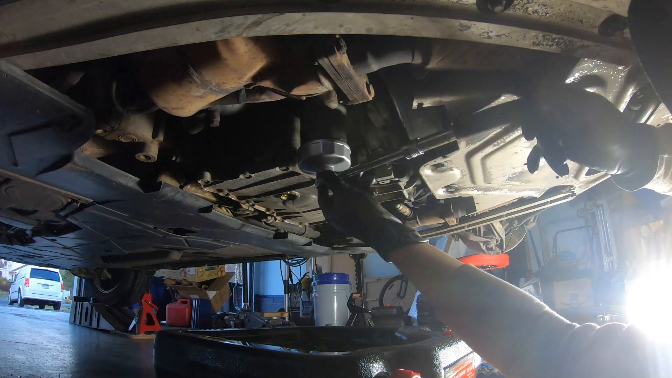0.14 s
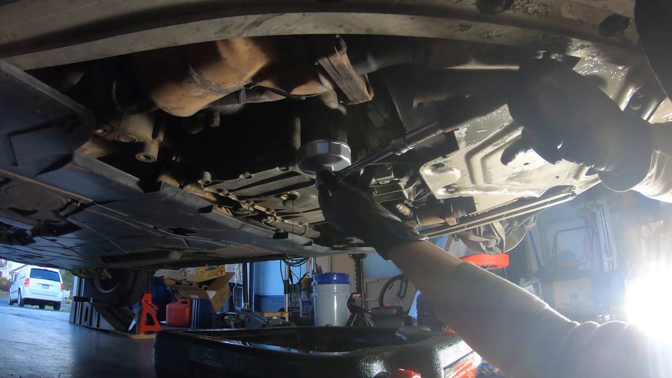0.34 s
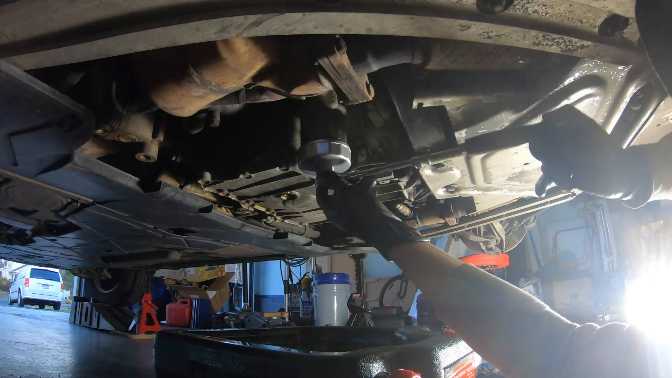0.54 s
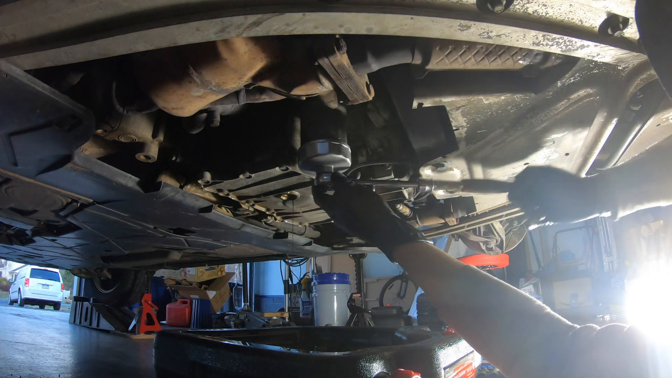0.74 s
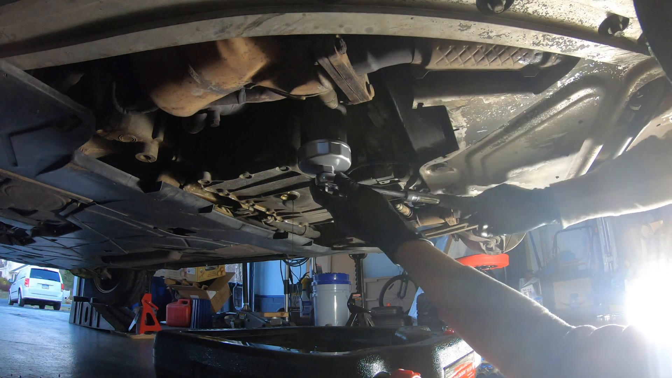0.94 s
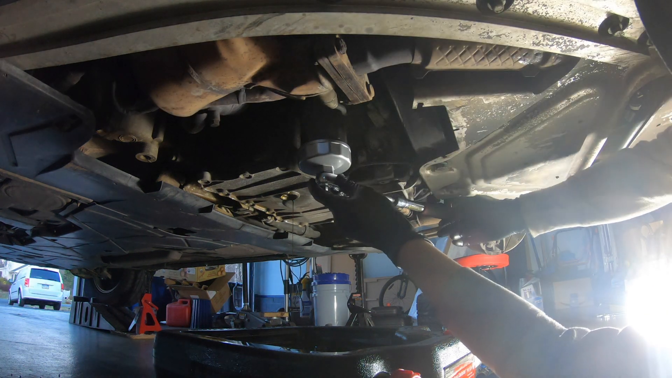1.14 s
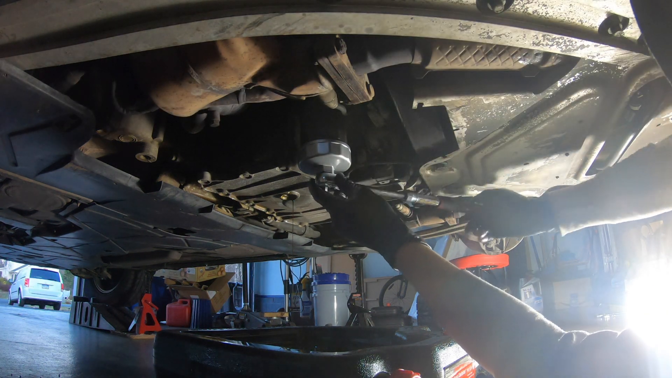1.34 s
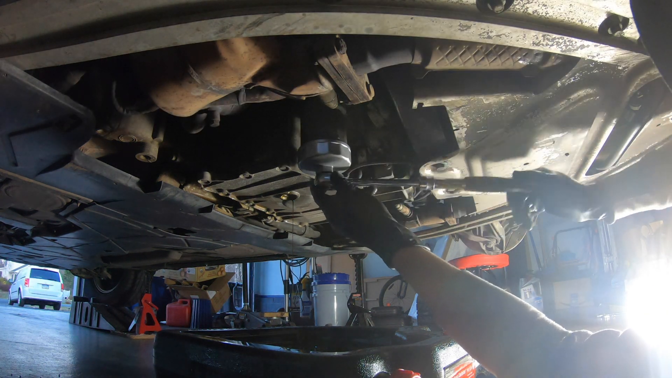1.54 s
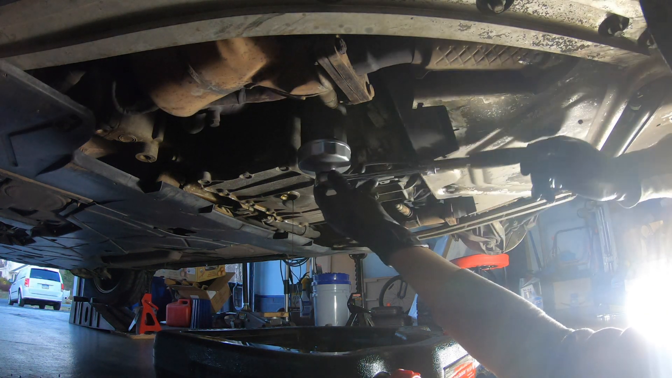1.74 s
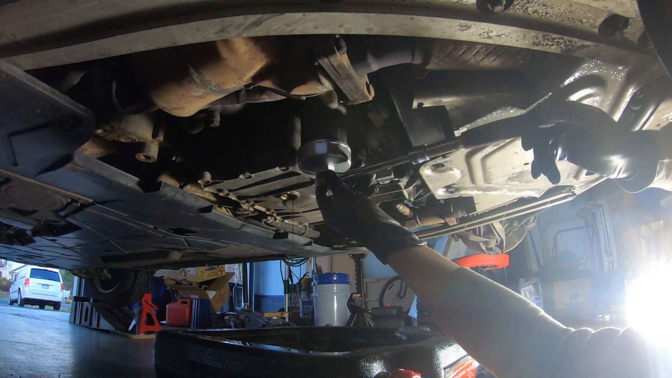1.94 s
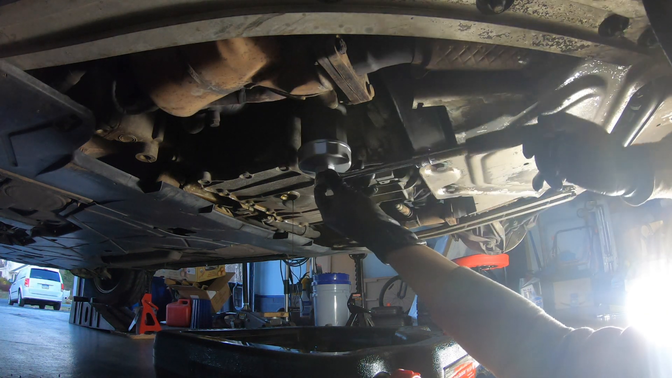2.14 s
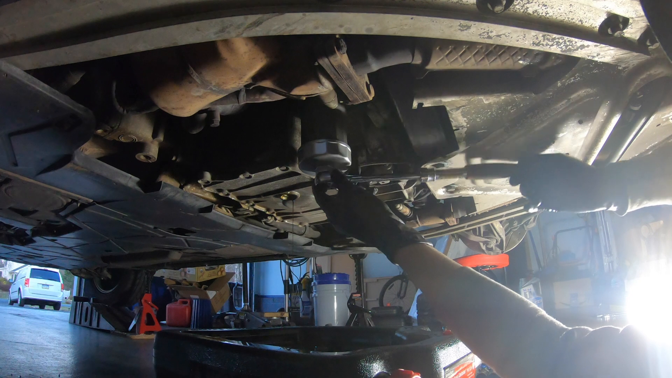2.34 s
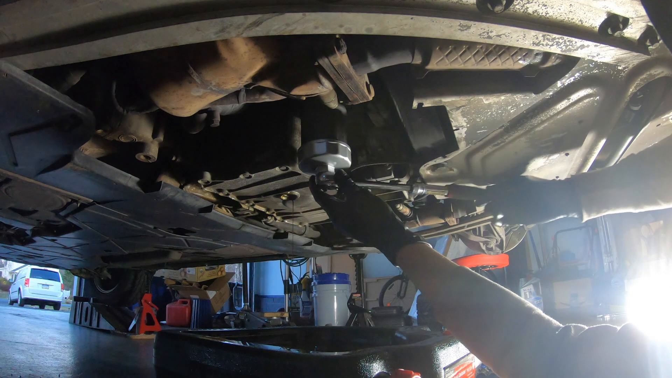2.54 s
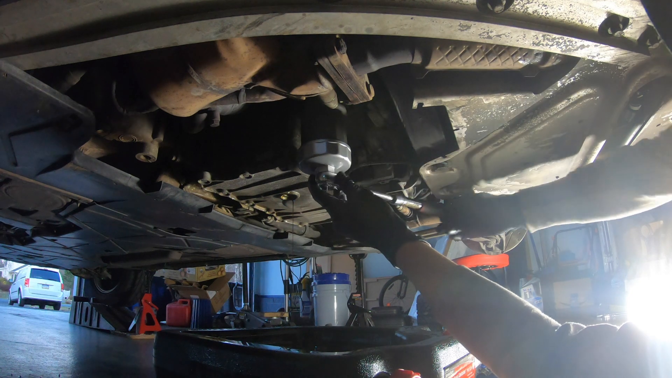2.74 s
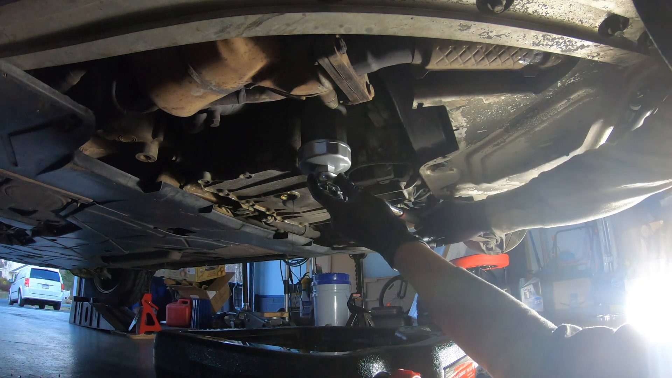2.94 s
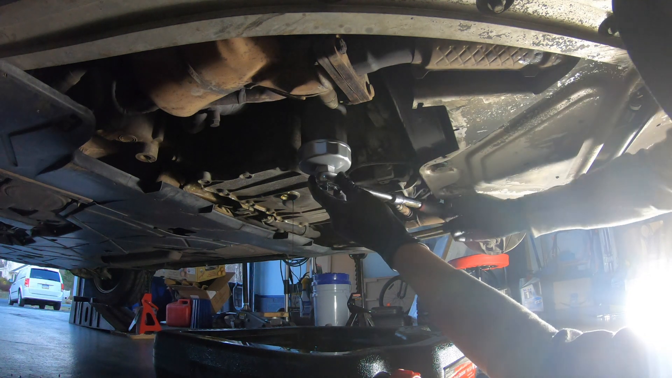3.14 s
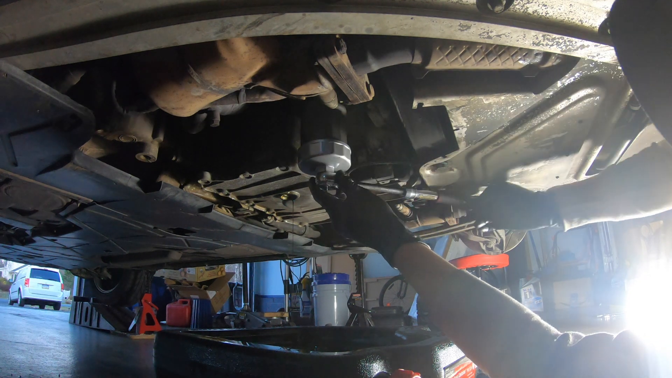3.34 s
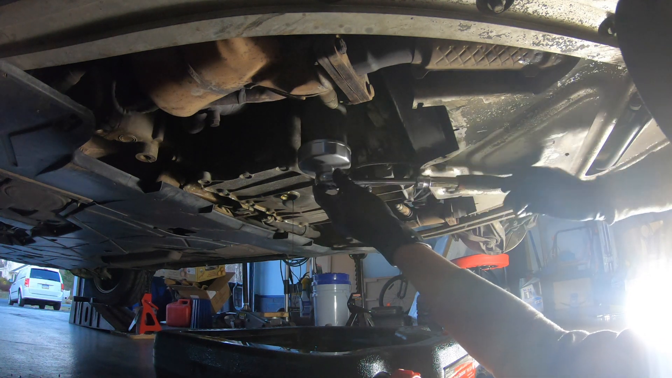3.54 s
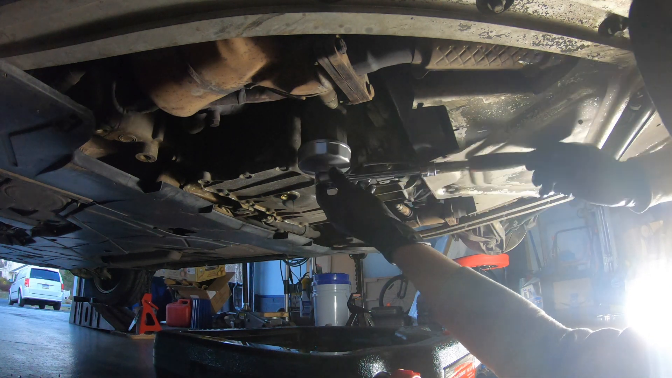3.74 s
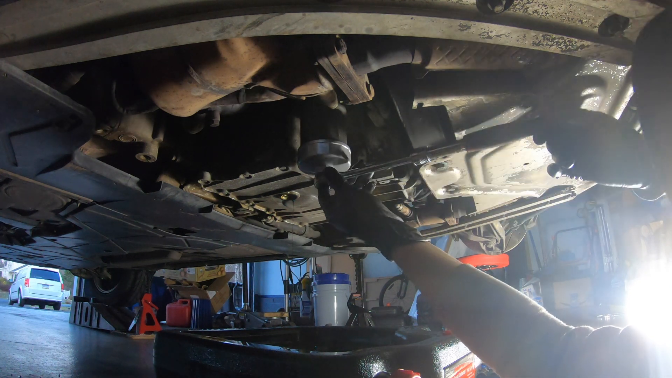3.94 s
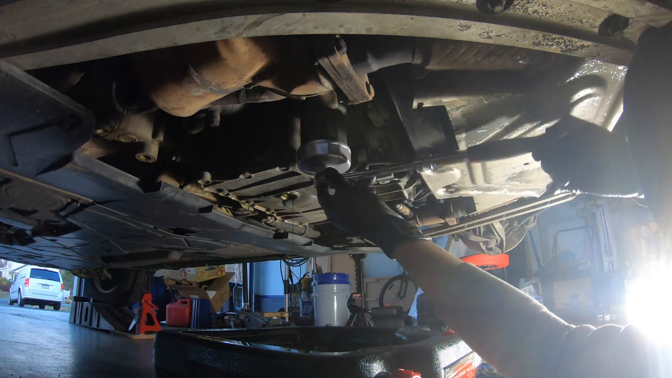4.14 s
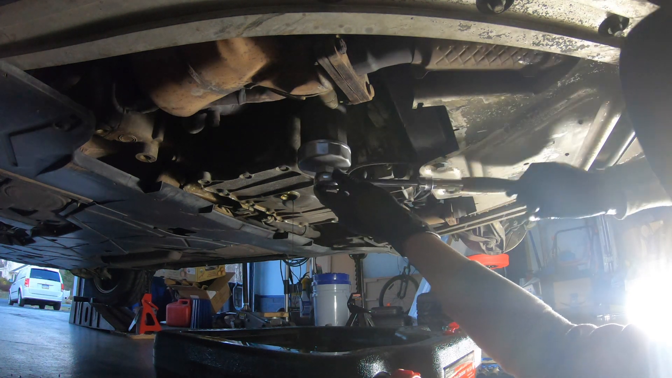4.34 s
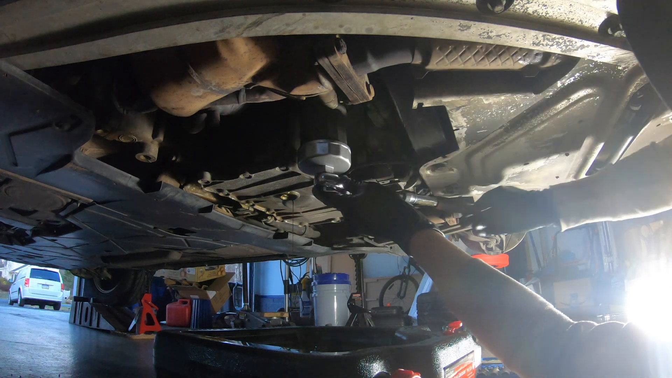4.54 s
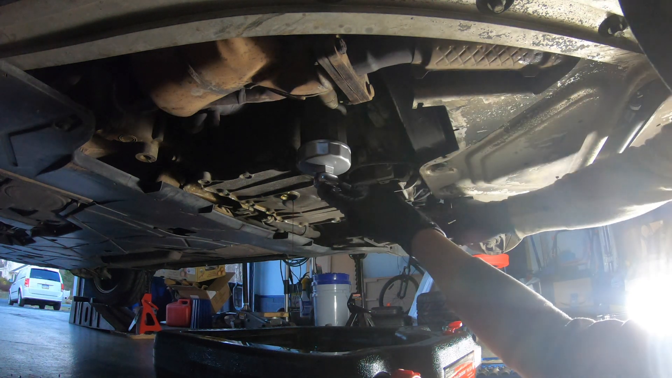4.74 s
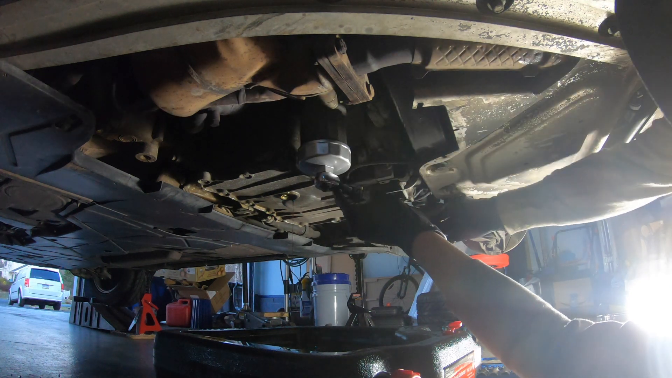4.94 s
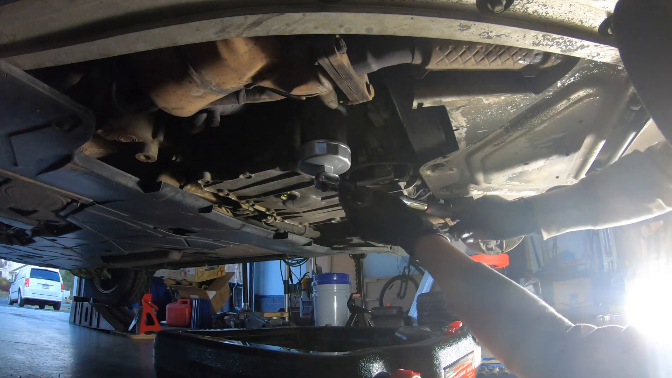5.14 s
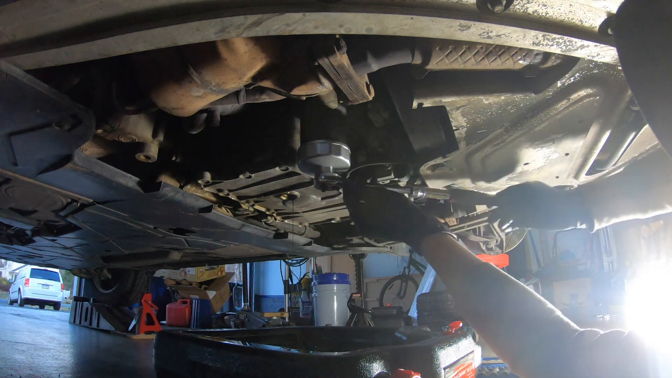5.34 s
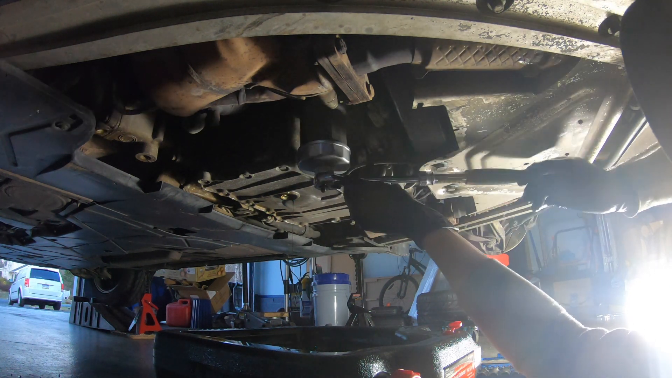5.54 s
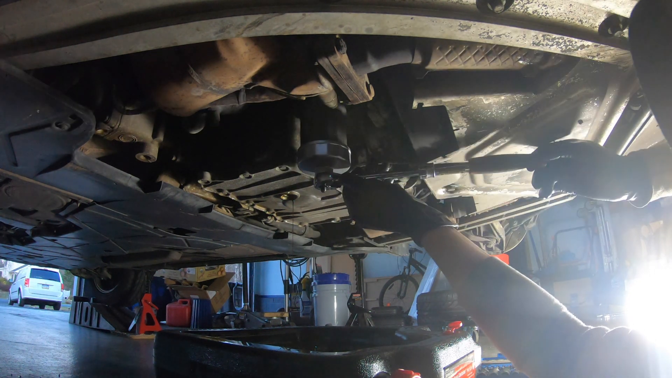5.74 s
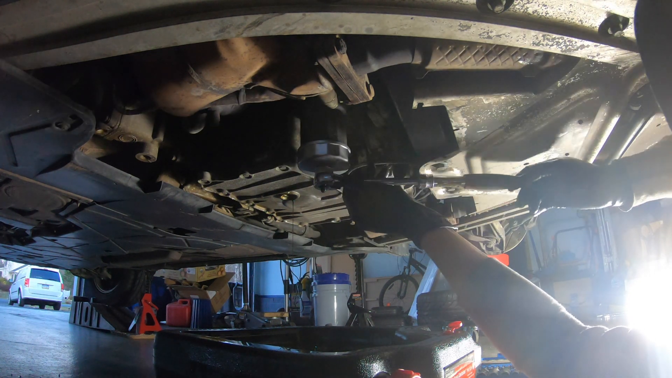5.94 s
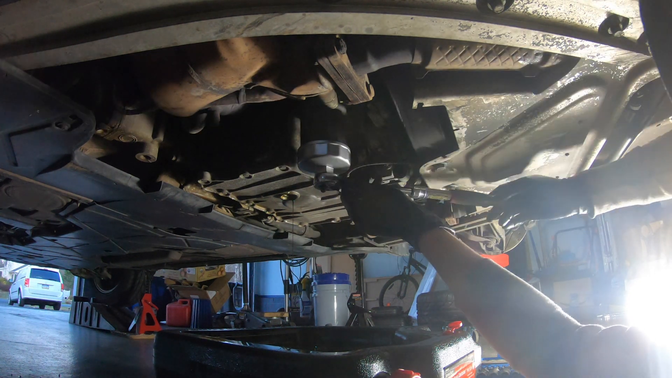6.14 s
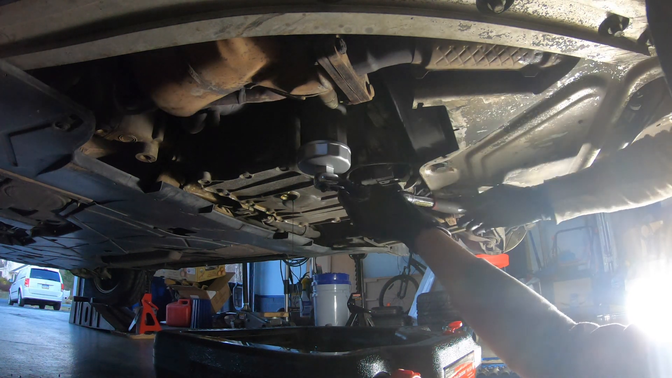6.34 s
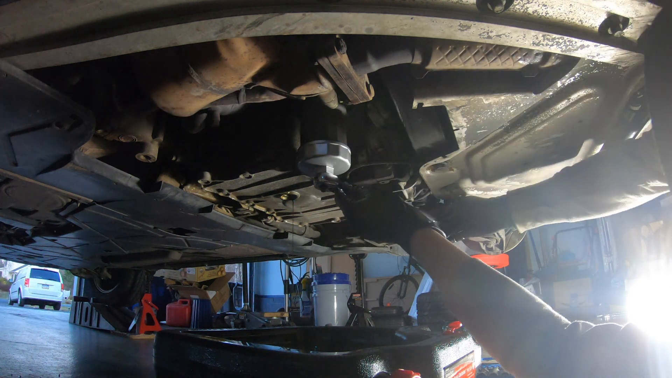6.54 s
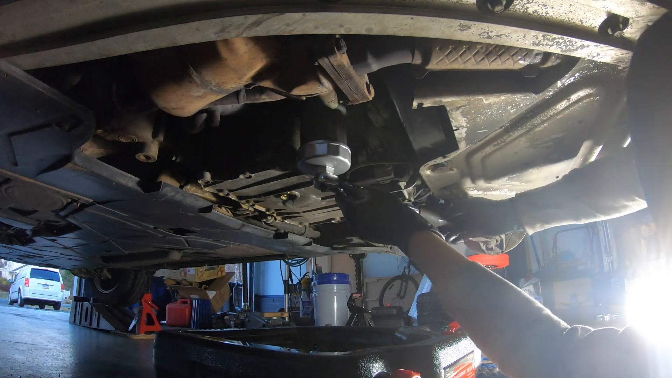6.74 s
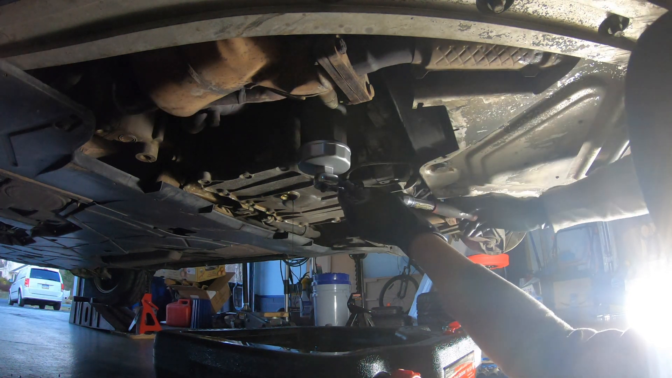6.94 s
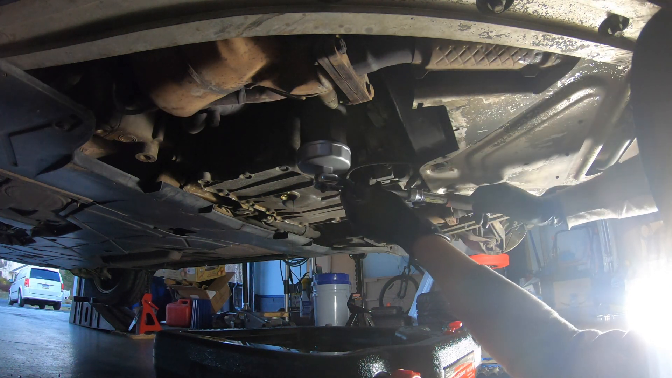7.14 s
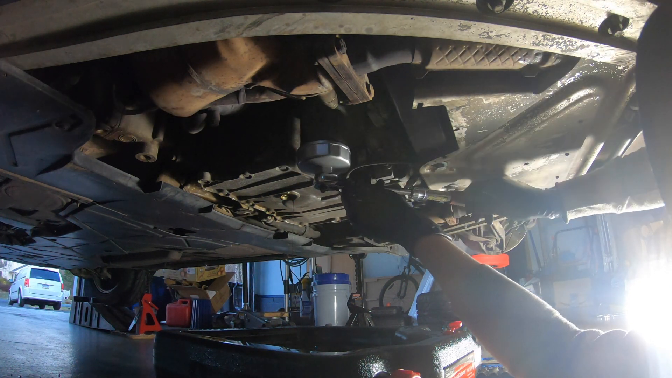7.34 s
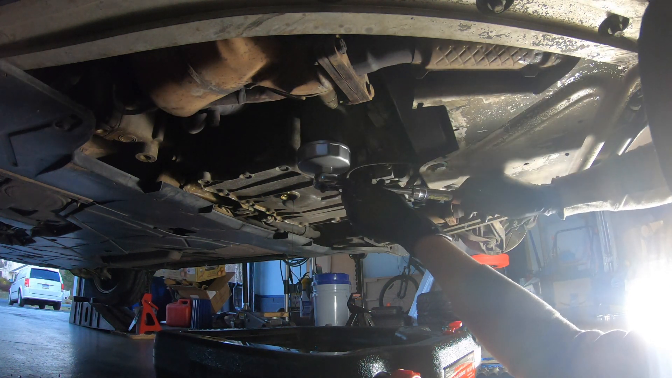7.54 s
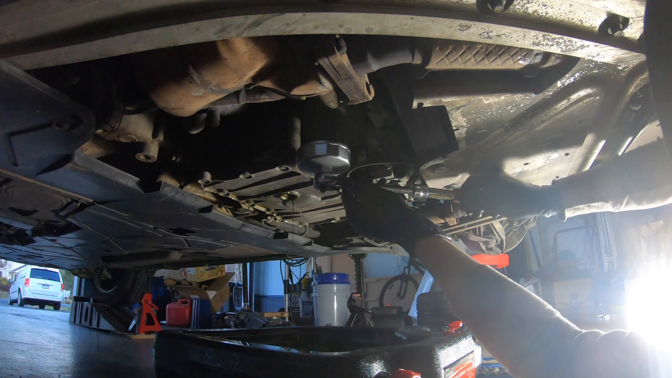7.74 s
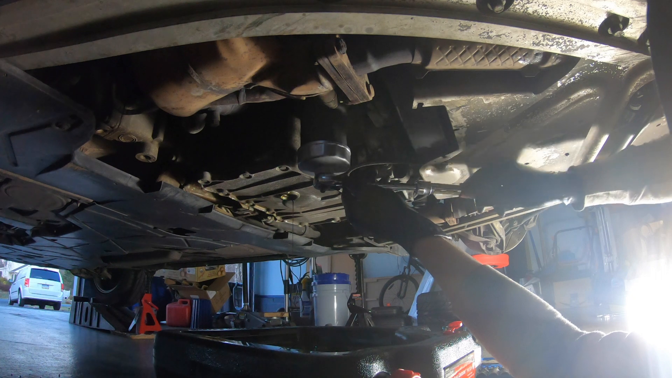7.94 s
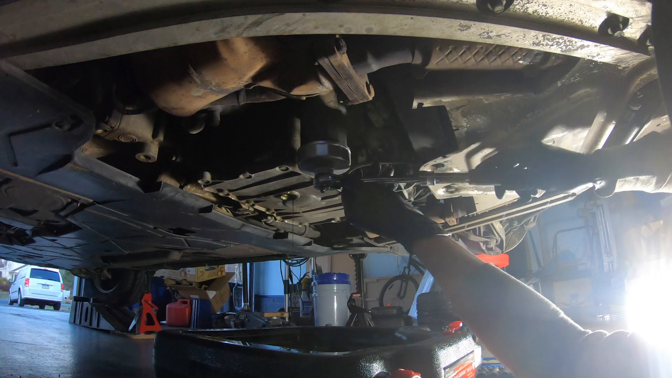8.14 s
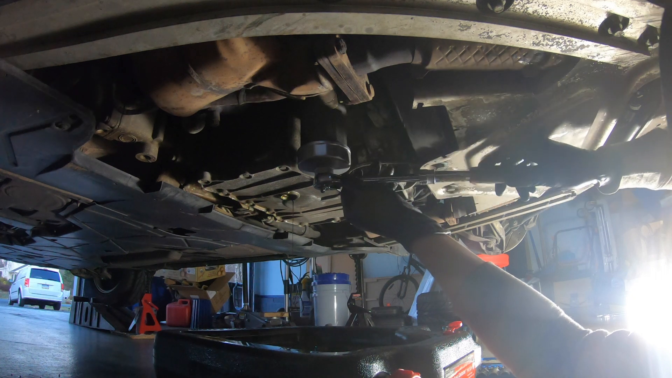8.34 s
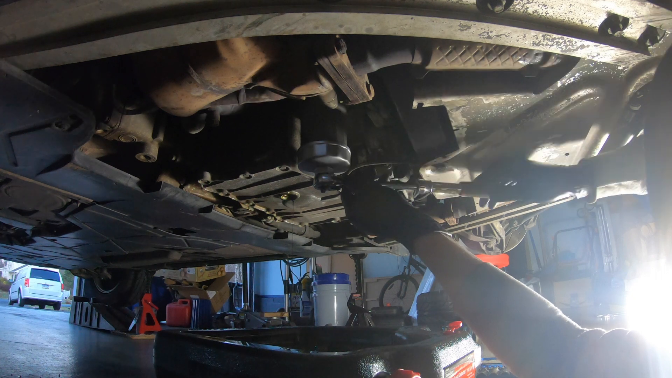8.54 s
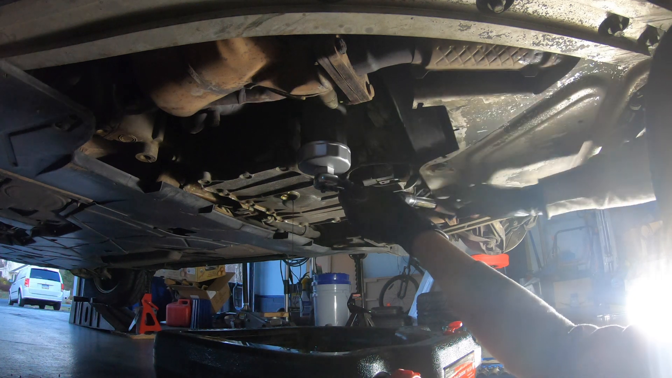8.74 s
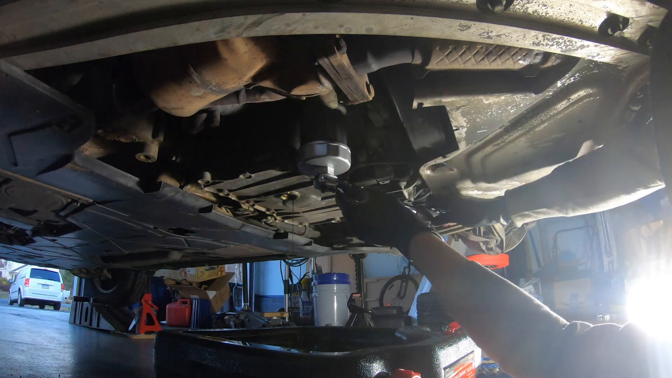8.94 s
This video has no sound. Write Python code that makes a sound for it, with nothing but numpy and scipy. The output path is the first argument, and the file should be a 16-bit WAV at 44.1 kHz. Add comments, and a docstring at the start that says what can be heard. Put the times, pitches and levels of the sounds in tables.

```python
"""A low, unevenly swelling drone and soft air in a garage, then a gloved hand skids with a squawk and a thud.
Under a car a ratchet works a filter housing: runs of pawl clicks, socket knocks, light finger ticks.
Blows are noise cracks, steel modes and underbody scatter; the glove is shaped noise, its skid a slowing
train of slips. Two close microphone ports hear it all, with a soft garage tail behind the near sounds."""
import sys
import numpy as np
from scipy import signal
from scipy.fft import rfft, irfft
from scipy.io import wavfile
from scipy.ndimage import uniform_filter1d

SR = 44100
rng = np.random.default_rng(int(sys.argv[2]) if len(sys.argv) > 2 else 0)


def output_pcm(signal):
    """Save a mono or channel-first signal as 16-bit PCM at the path in sys.argv[1].

    Samples are clipped to [-1, 1] before scaling.
    """
    pcm = np.clip(np.atleast_2d(signal).T, -1, 1) * 32767
    wavfile.write(sys.argv[1], SR, np.round(pcm).astype(np.int16))


N = 397341  # length in samples, about 9 s

# colour of sound scattered by the underbody: hz, level_db (per Hz)
SCATTER_COLOUR = [(1200, 8.5), (3000, -2.5), (7000, -4.5)]
# colour of a soft, low thud: hz, level_db (per Hz)
THUD_COLOUR = [(60, -29), (220, -7.5), (325, 5), (470, -14.5), (950, -3.5), (1500, -19), (2700, -16),
               (7000, -55)]
SOCKET_HZ = 3260  # strongest resonance of the socket


def amp(db):
    """Decibels to gain."""
    return 10 ** (np.asarray(db) / 20)


def evened(x):
    """Scales to rms 1."""
    return x / np.sqrt(np.mean(x ** 2) + 1e-20)


def read(points, hz):
    """Reads a table on a log-frequency axis."""
    f, value = np.transpose(points)
    return np.interp(np.log(hz + 1), np.log(f + 1), value)


def add(mix, s, sound):
    """Mixes a stereo sound in at time s."""
    part = mix[:, max(round(s * SR), 0):][:, :sound.shape[1]]
    part += sound[:, :part.shape[1]]


def noise(size, colour=None):
    """Stereo noise as two close microphone ports hear a diffuse field, flat or coloured, rms 1."""
    # left-right likeness of scattered sound: hz, correlation
    likeness = [(150, 0.9), (550, 0.35), (1100, 0.059), (2200, 0.43), (4000, 0.57), (10000, 0.057)]
    hz = np.fft.rfftfreq(size, 1 / SR)
    mid, side = rfft(rng.standard_normal((2, size)))
    same = np.clip(read(likeness, hz), -1, 1)
    mid, side = mid * np.sqrt(1 + same), side * np.sqrt(1 - same)
    gain = 1 if colour is None else amp(read(colour, hz))
    return evened(irfft(np.array([mid + side, mid - side]) * gain, size))


def causal(db):
    """Minimum-phase response for a gain curve, so that attacks stay sharp."""
    log_gain = np.log(amp(np.r_[db, db[-2:0:-1]]))
    return np.exp(np.conj(signal.hilbert(log_gain)))[:len(db)]


def grain(depth_db, size=90):
    """An uneven gain of rms 1 that changes over about `size` samples."""
    return evened(amp(depth_db * evened(uniform_filter1d(rng.standard_normal(N), size))))


def resonate(x, peaks):
    """Sums a sound's passage through resonances given as hz, width_hz, level_db."""
    out = 0
    for hz, width, db in peaks:
        out = out + amp(db) * signal.lfilter(*signal.iirpeak(hz, hz / width, SR), x)
    return out


def background():
    """A low drone of noise that swells unevenly, under soft air noise with two faint, wavering tones."""
    # colours of drone and air: hz, level_db (per Hz)
    drone_colour = [(20, -26), (65, -14), (110, -23.5), (150, -6), (233, 0), (312, -6.5), (500, -21),
                    (900, -71)]
    air_colour = [(350, -29), (560, -10), (770, -0.5), (920, -7.5), (1800, -8.5), (2300, -19),
                  (6800, -27.5), (10000, -40), (16000, -63)]
    # narrow resonances heard as tones in the air: hz, width_hz, level_db
    tones = [(731, 24, -9.5), (1104, 18, 6.5)]
    # brief swells of the drone: centre_s, half_length_s, rise_db
    swells = [(0.65, 0.3, 9), (1.282, 0.38, 6)]
    drone_db, air_db = -60.5, -63
    t = np.arange(N) / SR
    unevenness = grain(depth_db=1.8, size=3000)
    rise_db = sum(db * np.maximum(1 - abs(t - s) / half, 0) for s, half, db in swells)
    drone = noise(N, drone_colour) * unevenness * amp(drone_db + rise_db)
    air = noise(N, air_colour)
    return drone + amp(air_db) * evened(air + resonate(air, tones))


def stroke(s, rise, fall):
    """Speed of a hand that starts at time s, speeds up and slows to rest, as a gain from 0 to 1."""
    return np.interp(np.arange(N) / SR, [s, s + rise, s + rise + fall], [0, 1, 0])


def glove():
    """Friction noise: rubs follow the hand's speed, firm ones chafe coarsely, and a rustle runs throughout."""
    # the glove rubs on the tool: start_s, rise_s, fall_s, hiss_db, low_chafe_db
    rub_strokes = [(1.882, 0.019, 0.093, -49.5, -84), (2.95, 0.18, 0.08, -56.5, -66),
                   (3.689, 0.014, 0.21, -55, -62), (3.78, 0.14, 0.1, -50.5, -46),
                   (4.99, 0.037, 0.036, -58.5, -65), (6.433, 0.038, 0.18, -50, -62),
                   (7.15, 0.1, 0.46, -67, -81), (7.619, 0.057, 0.045, -63.5, -61.5),
                   (8.04, 0.059, 0.28, -64.5, -73), (8.44, 0.079, 0.39, -55, -56),
                   (8.9, 0.075, 0.044, -46.5, -55)]
    # the housing turns in the gloved hand with a soft swish: start_s, rise_s, fall_s, level_db
    swish_strokes = [(7.2, 0.13, 0.26, -60.5), (8.02, 0.055, 0.23, -54)]
    # colours of hiss and chafe: hz, level_db (per Hz)
    hiss_colour = [(400, -30), (1400, 6), (6500, -0.5), (10000, -12.5), (15500, -44)]
    chafe_colour = [(200, -15), (480, -5.5), (780, -9.5), (3500, -3), (8000, -75)]
    # resonances of the housing under a firm rub, and of the swish: hz, width_hz, level_db
    chafed_housing = [(668, 52, 21), (960, 58, 21)]
    swish_peak = [(2120, 1100, 0)]
    hiss = noise(N, hiss_colour) * grain(depth_db=1.5)
    catches = grain(depth_db=3, size=220)
    chafe = noise(N, chafe_colour) * catches
    chafe = evened(chafe + resonate(chafe.mean(0), chafed_housing))
    # two passes steepen the swish's resonance
    swish = evened(resonate(resonate(noise(N) * catches, swish_peak), swish_peak))
    out = np.zeros((2, N))
    for s, rise, fall, hiss_db, chafe_db in rub_strokes:
        out += stroke(s, rise, fall) * (amp(hiss_db) * hiss + amp(chafe_db) * chafe)
    for s, rise, fall, db in swish_strokes:
        out += stroke(s, rise, fall) * amp(db) * swish
    rustle = hiss * grain(depth_db=2, size=9000)
    return out + amp(-77.5) * rustle


def squawk(echoes):
    """The glove sticks and slips on a panel, ever slower and duller, and ends in a thud."""
    # resonances of the rubbed panel: hz, width_hz, level_db
    panel = [(1200, 130, 6), (2760, 90, 0), (3800, 79, 3), (4270, 99, 3)]
    # colour of the scuffing: hz, level_db (per Hz)
    scuff_colour = [(200, -42), (730, -20), (1150, -0.5), (1900, -10), (4500, -15.5), (5100, -22.5),
                    (8500, -33), (14000, -69)]
    # the glove bites, holds and lets go
    skid_s, skid_db, bite_s, hold_s, fade_db_per_s = 0.311, -33.5, 0.0076, 0.045, 480
    slip_start_hz, slip_end_hz, slowing_s = 2100, 169.4, 0.0066
    dulled_s, dull_hz = 0.11, 1700  # fully dulled after this time, by a low-pass at this cutoff
    scatter_s = 0.0053
    direct = 0.35  # share of the skid that reaches both ports alike
    thud_s, thud_peak_db, thud_rise_db_per_s, thud_fade_db_per_s = 0.385, -39, 252, 263

    t = np.arange(N) / SR
    age = np.maximum(t - skid_s, 0)
    letting_go = amp(skid_db - fade_db_per_s * np.maximum(age - hold_s, 0))
    pressure = np.minimum(age / bite_s, 1) ** 2 * letting_go
    slip_hz = slip_end_hz + (slip_start_hz - slip_end_hz) * np.exp(-age / slowing_s)
    turns = np.cumsum(slip_hz * grain(depth_db=.6, size=60)) / SR
    catches = grain(depth_db=1.7, size=60)
    # one impulse for every whole turn
    slips = np.diff(np.floor(turns), prepend=0) * catches
    # each slip reaches the ports by many short paths
    path = rfft(echoes * np.exp(-t[:echoes.shape[1]] / scatter_s))
    hz = np.fft.rfftfreq(echoes.shape[1], 1 / SR)
    path = irfft(path * causal(read(scuff_colour, hz) - read(SCATTER_COLOUR, hz)))
    slipping = signal.fftconvolve(slips[None] / np.sqrt(slip_hz), path, axes=1)[:, :N]
    scuff = .9 * evened(slipping) + .35 * noise(N, scuff_colour) * catches
    scuff = evened(direct * scuff.mean(0) + (1 - direct) * scuff)
    slowed = np.clip(age / dulled_s, 0, 1)
    dulled = signal.lfilter(*signal.butter(1, dull_hz, fs=SR), scuff)
    scuff = pressure * ((1 - slowed) * scuff + slowed * dulled)
    # the thud swells up to its peak and dies away after it
    below_peak_db = np.maximum((thud_s - t) * thud_rise_db_per_s, (t - thud_s) * thud_fade_db_per_s)
    thud = noise(N, THUD_COLOUR) * amp(thud_peak_db - below_peak_db)
    return scuff + resonate(scuff, panel) + thud


def strike(levels_db, echoes, ring_hz, favour_db, crack_s=0.0012, ring_db=-23,
           scatter_db=-18, scatter_s=0.014, rise_s=0.0013, direct_s=0.0005, size=8192):
    """Steel hits steel: a short crack, ringing modes, and a dense scatter from the underbody."""
    # modes of wrench and socket: hz, level_db, t60_s
    steel = [(833, 1.5, 0.056), (1330, 8.5, 0.015), (1621, -10.5, 0.17), (2720, 2.5, 0.018),
             (3397, 5.5, 0.022), (5840, 17, 0.0054), (6584, -2, 0.035), (7280, -8, 0.059), (8830, 1, 0.035)]
    # overall colour of a blow: hz, level_db
    crack_colour = [(200, -37.5), (500, -21.5), (780, -3.5), (1300, -2), (1950, -3.5), (2700, 2.5),
                    (4300, 1.5), (5100, -8.5), (7100, -4), (8100, -9.5), (10500, -19.5), (16000, -37.5)]
    # width of a blow between the ports: hz, side_db
    side_width = [(900, -5.5), (5000, 0)]
    t, hz = np.arange(size) / SR, np.fft.rfftfreq(size, 1 / SR)
    # the first wave reaches both ports alike, then reflections set them apart
    alike = np.exp(-t / direct_s)
    crack = alike * rng.standard_normal(size) + np.sqrt(1 - alike ** 2) * noise(size)
    crack = crack * np.exp(-t / crack_s)
    ring = np.zeros((2, size))
    for mode_hz, db, t60 in steel:
        # the grip and the angle of the handle change how each mode answers:
        # detuning (share of its pitch), level (dB), phase at each port (radians)
        detune, swing, left, right = rng.standard_normal(4) * [.011, 3.2, .7, .7]
        phase = 2 * np.pi * rng.random() + np.array([[left], [right]])
        tone = np.sin(2 * np.pi * mode_hz * (1 + detune) * t + phase)
        ring += amp(db + swing - 60 * t / t60) * tone
    # some paths stay put, others change as the arm moves
    scatter = evened(echoes + noise(size, SCATTER_COLOUR)) * np.exp(-t / scatter_s)
    blow = crack + amp(ring_db) * ring + amp(scatter_db) * scatter
    blow = blow * (1 - np.exp(-t / rise_s))
    # the steel bounces once, 0.5 to 1.4 ms later at a quarter of the strength, and ripples the colour
    bounce = 1 + .25 * np.exp(-2j * np.pi * hz * rng.uniform(.0005, .0014))
    # one resonance, 260 Hz wide, takes more of the blow than the others
    favoured = 1 + amp(favour_db) / (1 + 2j * (hz - ring_hz) / 260)
    z = rfft(blow) * bounce * favoured * causal(read(crack_colour, hz))
    # each blow shares its energy in its own way between body, middle and treble (Hz)
    bands = [(600, 1800), (2000, 4500), (5000, 12000)]
    mid = z.mean(0)
    power = abs(mid) ** 2 / size
    share = []
    for (lo, hi), wanted_db in zip(bands, levels_db):
        held_db = 10 * np.log10(power[(hz > lo) & (hz < hi)].sum())
        share += [(lo, wanted_db - held_db), (hi, wanted_db - held_db)]
    z = mid + (z - mid) * amp(read(side_width, hz))
    return irfft(z * causal(read(share, hz)))


def socket(echoes):
    """Knocks with a low thud: light ones leave the socket pinging, a hard one rings the whole housing."""
    # the socket shifts in its play and knocks on the housing, mostly as the swing turns round:
    # start_s, body_db, middle_db, treble_db
    knocks = [(0.4706, -25.5, -18.5, -31.5), (1.28, -23, -22, -30.5), (1.581, -24.5, -23, -31),
              (1.5965, -9.5, -7, -7.5), (2.1629, -20.5, -17.5, -23.5), (2.4794, -21, -21, -19.5),
              (5.1192, -29.5, -33.5, -40.5), (5.682, -22.5, -18.5, -31), (5.9108, -29.5, -26, -40.5)]
    # the socket pings on after a knock: hz, level_db (over the knock's middle), t60_s
    ping = (3430, -40, 0.35)
    # modes of the housing under a hard blow: hz, level_db (over the knock's middle), t60_s
    housing = [(390, -46, 0.71), (2920, -25, 0.057), (3200, -18, 0.054), (3192, -52.5, 0.44)]
    seated_db = -10  # a blow with a stronger middle seats the socket and rings the housing
    out, t = np.zeros((2, N)), np.arange(SR // 2) / SR
    for s, body_db, middle_db, treble_db in knocks:
        add(out, s, strike([body_db, middle_db, treble_db], echoes, SOCKET_HZ, favour_db=3))
        modes = housing if middle_db > seated_db else [ping]
        ring = sum(amp(db - 60 * t / t60) * np.sin(2 * np.pi * hz * t) for hz, db, t60 in modes)
        thud = noise(len(t), THUD_COLOUR) * amp(-31.0 - 60 * t / 0.12)  # t60 0.12 s
        add(out, s, amp(middle_db) * ring + amp(body_db) * thud)
    return out


def pawl(echoes):
    """One click for every tooth of the back swing; the grip decides which wrench resonance answers most."""
    # the pawl drops over one tooth: start_s, body_db, middle_db, treble_db, strongest_resonance_hz
    clicks = [(0.6129, -27.5, -14.5, -13, 6340), (0.6478, -22.5, -16, -12, 7520),
              (0.678, -23.5, -14, -11, 3830), (0.7053, -19.5, -11, -15, 3680),
              (0.7312, -23, -15.5, -10, 7100), (0.757, -22.5, -15, -14, 3130), (0.783, -20, -20, -20, 7060),
              (0.815, -16.5, -15, -18, 2700), (0.849, -17, -15, -15.5, 2690),
              (0.8958, -21, -14.5, -16.5, 8860), (0.9414, -14, -18, -17.5, 840),
              (0.9787, -21, -16, -17, 7200), (1.034, -23, -16.5, -15.5, 7800),
              (1.069, -27.5, -21, -17, 7460), (1.1332, -30.5, -19.5, -20, 6650),
              (2.2992, -24, -14.5, -16, 2600), (2.375, -29, -14, -15.5, 6800),
              (2.4598, -17, -18.5, -14.5, 6500), (2.5479, -19.5, -15, -20, 2640),
              (2.6383, -23.5, -15.5, -15.5, 6520), (2.7364, -22, -16.5, -20.5, 2720),
              (2.8413, -24, -15.5, -16, 2580), (2.9614, -24, -14.5, -16, 2750),
              (3.1882, -24.5, -17, -21, 5500), (4.289, -22.5, -21, -17.5, 6360),
              (4.3247, -28.5, -21, -17, 6760), (4.3546, -28.5, -25, -18, 6490),
              (4.3996, -28, -24.5, -22, 7460), (4.4351, -26.5, -29, -21.5, 7050),
              (4.4715, -25.5, -24, -17.5, 6540), (4.5117, -24, -22.5, -16.5, 7000),
              (4.555, -29.5, -18, -17, 6560), (4.595, -30.5, -17.5, -19, 2350),
              (4.636, -28.5, -21, -17, 7600), (4.686, -21.5, -16, -15.5, 3600),
              (4.7372, -23.5, -17.5, -15, 6800), (4.8104, -23, -19.5, -22.5, 2570),
              (4.9116, -32.5, -31, -29, 6850), (6.0539, -20.5, -21, -27, 3160),
              (6.1107, -21, -21, -21.5, 1210), (6.1688, -26.5, -15, -12.5, 7050),
              (6.2213, -19, -21, -21.5, 3300), (6.2941, -21, -20, -24.5, 3220),
              (6.3729, -19.5, -19.5, -16.5, 7440), (6.4171, -21, -18, -21.5, 3380),
              (6.5008, -18, -12.5, -15.5, 2660), (6.544, -18.5, -15, -18.5, 3360),
              (6.6617, -16.5, -18, -21.5, 1130), (8.5607, -16.5, -13.5, -17, 6640),
              (8.5991, -17.5, -17.5, -21, 3380), (8.6546, -18.5, -11.5, -12.5, 6740),
              (8.6887, -20.5, -14, -17.5, 3180), (8.7446, -13.5, -13.5, -14.5, 5630),
              (8.7777, -20, -11.5, -17.5, 3300), (8.8279, -17, -14, -15, 3280),
              (8.8821, -17.5, -15.5, -19.5, 2600), (8.9364, -19.5, -18, -18, 850)]
    out = np.zeros((2, N))
    for s, *levels_db, ring_hz in clicks:
        click = strike(levels_db, echoes, ring_hz, favour_db=4, crack_s=0.0014,
                       ring_db=-23.5, scatter_db=-14.5, scatter_s=0.0095)
        add(out, s, click)
    return out


def finger_ticks(echoes):
    """Light ticks as the fingers shift on the tool: faint blows of steel, weak in the treble."""
    # start_s, level_db
    ticks = [(1.494, -44.5), (1.5364, -36), (4.116, -42), (4.184, -37.5), (5.0905, -41), (6.8553, -30.5),
             (6.9586, -40.5), (7.642, -38.5), (7.675, -37), (7.7018, -34), (8.27, -36)]
    # added to each tick's level: body_db, middle_db, treble_db
    tick_colour_db = (1.5, -2, -12)
    out = np.zeros((2, N))
    for s, db in ticks:
        add(out, s, strike(db + np.array(tick_colour_db), echoes, SOCKET_HZ, favour_db=3))
    return out


def garage(x, build_s=0.0011, count=4):
    """A diffuse noise tail, longest in the middle; each wall receives a blow in a slightly different colour."""
    # reverberation time: hz, t60_s
    decay = [(250, 0.075), (1000, 0.71), (3300, 0.49)]
    out = np.zeros((2, N))
    # a cosine shifts each wall's share up and down in frequency by this much
    for blur_hz in np.linspace(0, 330, count):
        hz, t, z = signal.stft(noise(SR), SR, nperseg=256)
        z = z * amp(-60 * t / read(decay, hz)[:, None]) * (1 - np.exp(-t / build_s))
        tail = signal.istft(z, SR, nperseg=256)[1]
        sent = x.mean(0) * evened(np.cos(2 * np.pi * blur_hz * np.arange(N) / SR))
        out += signal.fftconvolve(sent[None], tail / np.linalg.norm(tail[0]), axes=1)[:, :N]
    return out / np.sqrt(count)


def scene():
    """Tool and hand under the car, a little louder on the right, in the garage."""
    echoes = noise(8192, SCATTER_COLOUR)  # fixed paths under the car, shared by blows and skid
    near = glove() + squawk(echoes) + socket(echoes) + pawl(echoes) + finger_ticks(echoes)
    near = near * amp([[-.7], [.7]])  # left, right (dB)
    return near + amp(-12.0) * garage(near) + background()


def record(dry):
    """The recorder's band limit: a steep low-pass at 16.3 kHz."""
    low_pass = signal.firwin(511, 16300, window=("kaiser", 9), fs=SR)
    return signal.oaconvolve(dry, low_pass[None], "same")


dry = scene()
out = record(dry)
output_pcm(out)
```